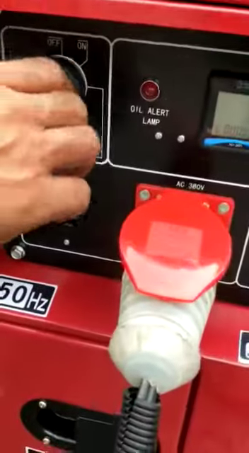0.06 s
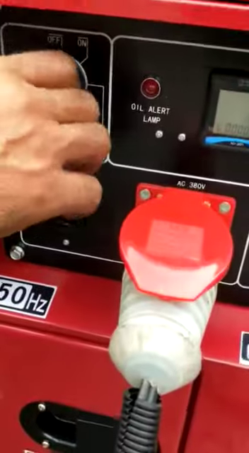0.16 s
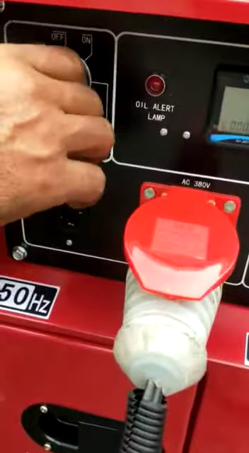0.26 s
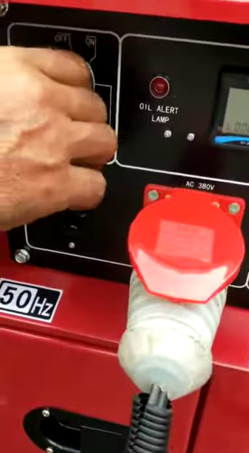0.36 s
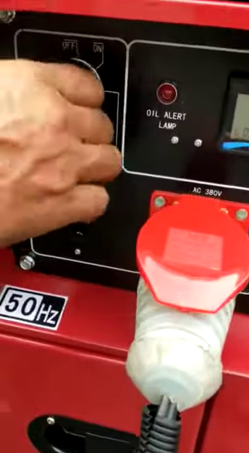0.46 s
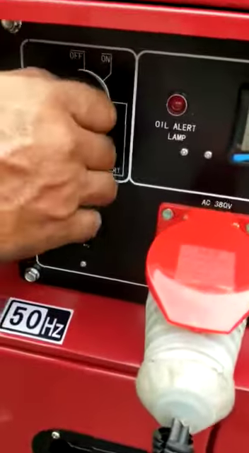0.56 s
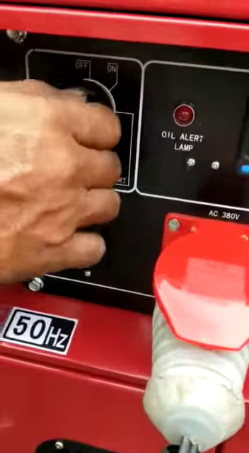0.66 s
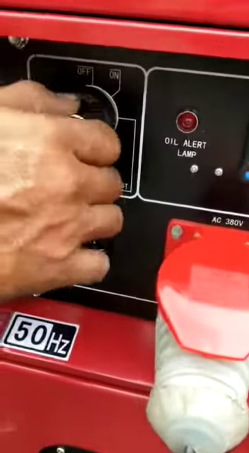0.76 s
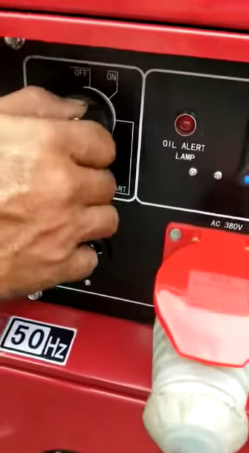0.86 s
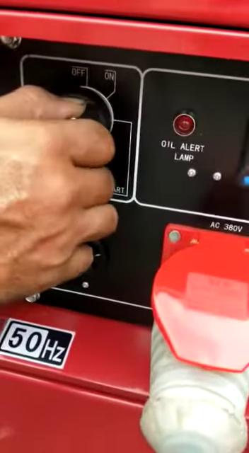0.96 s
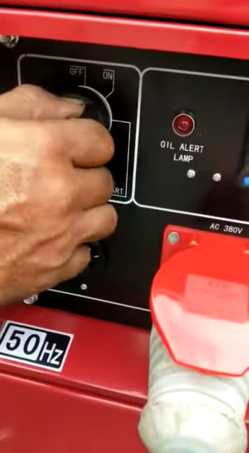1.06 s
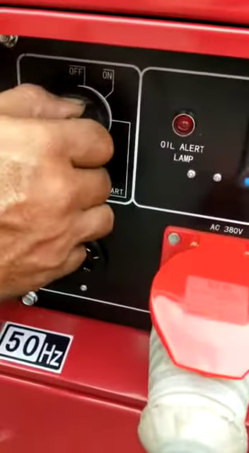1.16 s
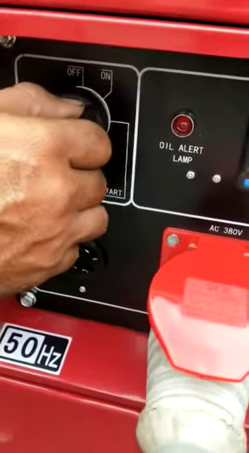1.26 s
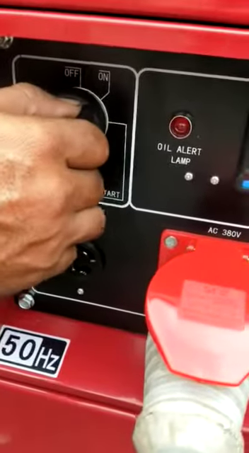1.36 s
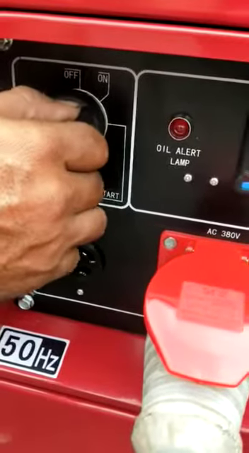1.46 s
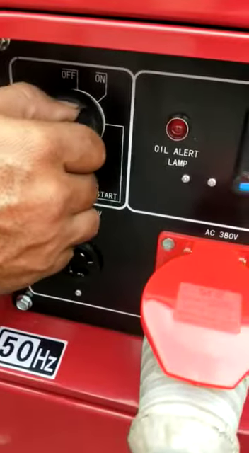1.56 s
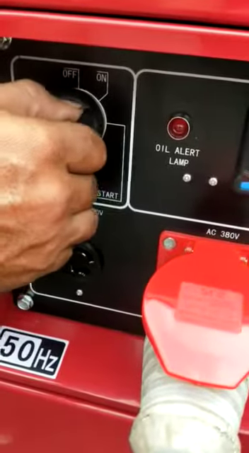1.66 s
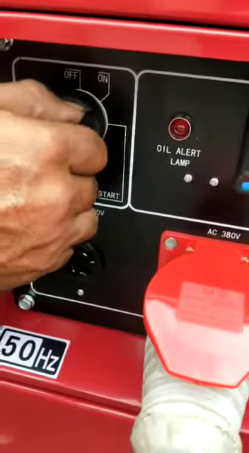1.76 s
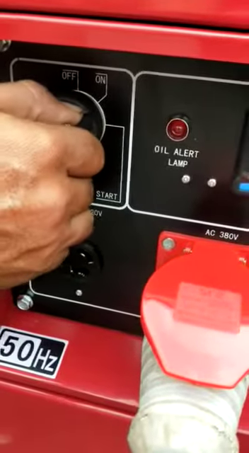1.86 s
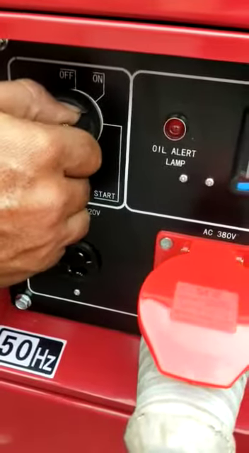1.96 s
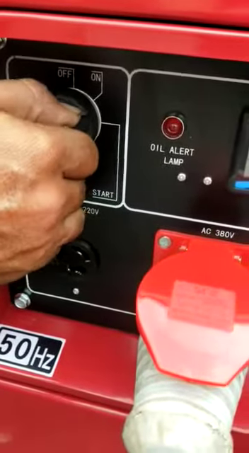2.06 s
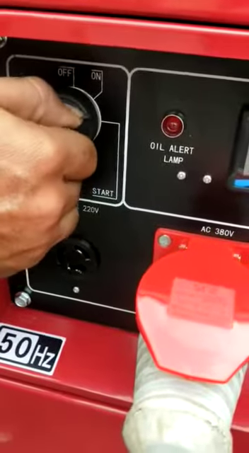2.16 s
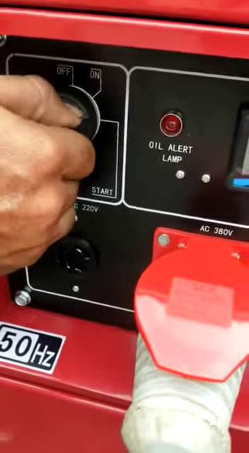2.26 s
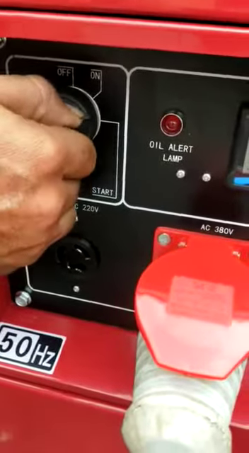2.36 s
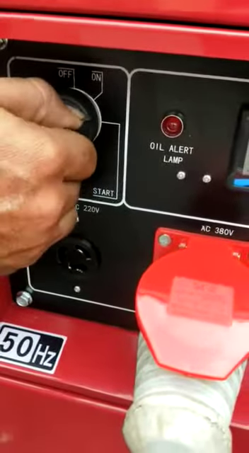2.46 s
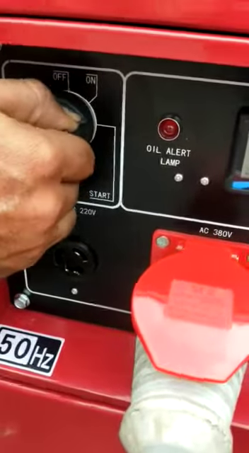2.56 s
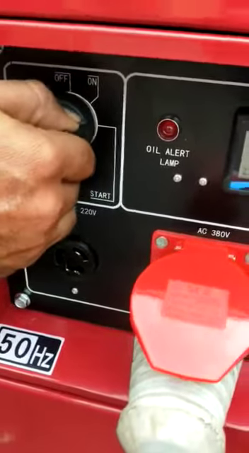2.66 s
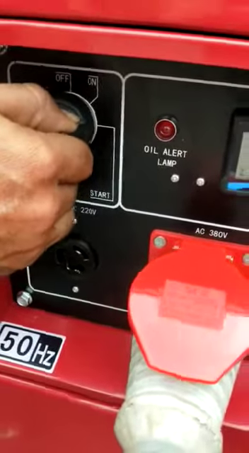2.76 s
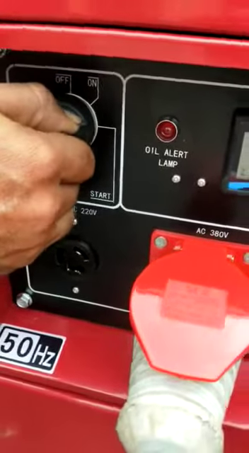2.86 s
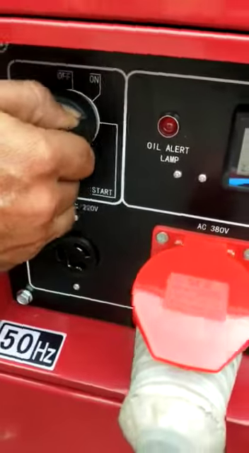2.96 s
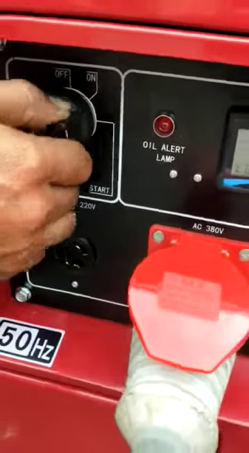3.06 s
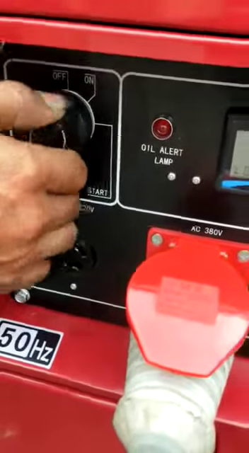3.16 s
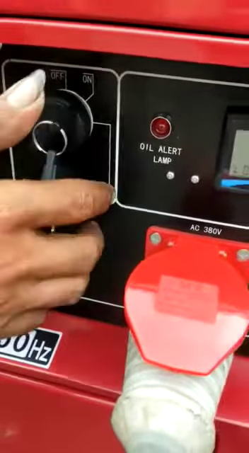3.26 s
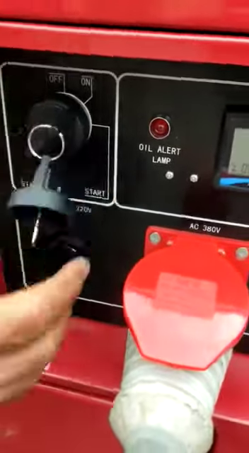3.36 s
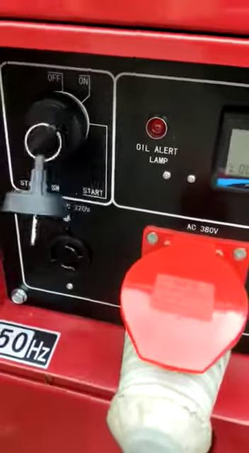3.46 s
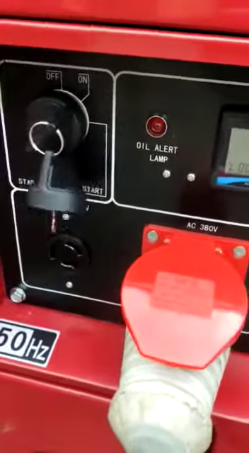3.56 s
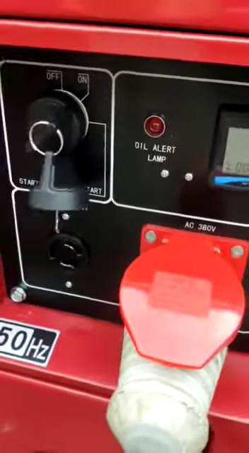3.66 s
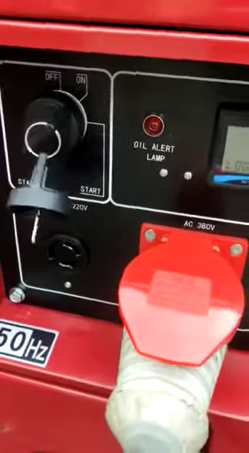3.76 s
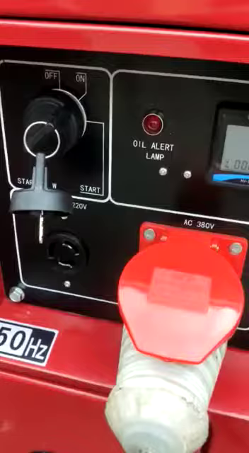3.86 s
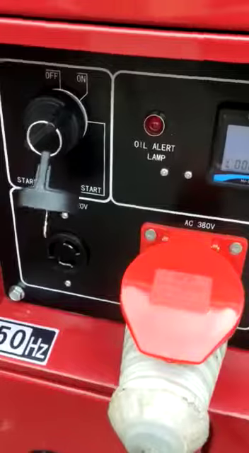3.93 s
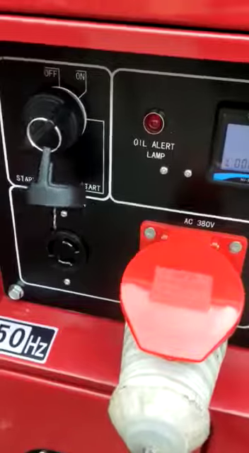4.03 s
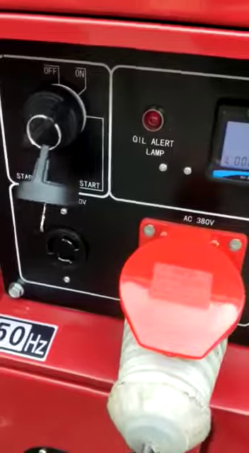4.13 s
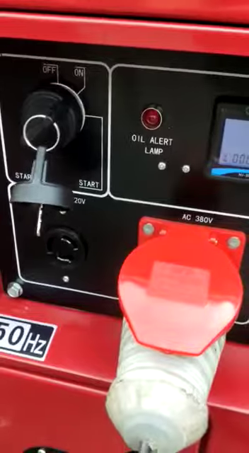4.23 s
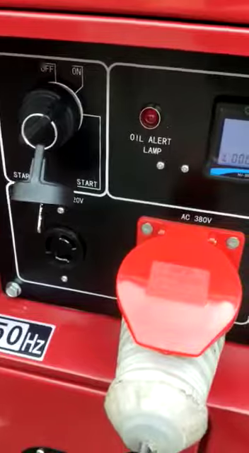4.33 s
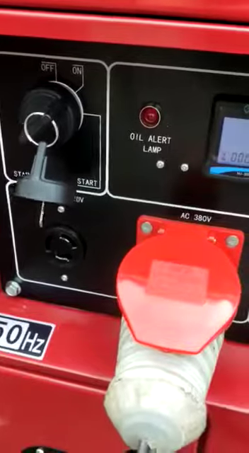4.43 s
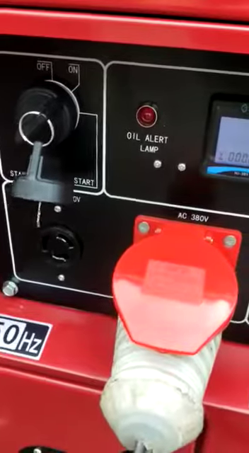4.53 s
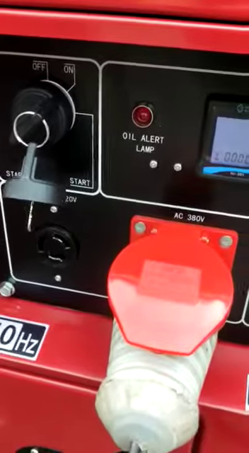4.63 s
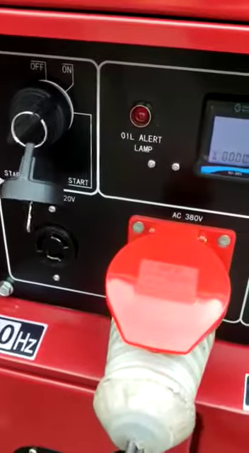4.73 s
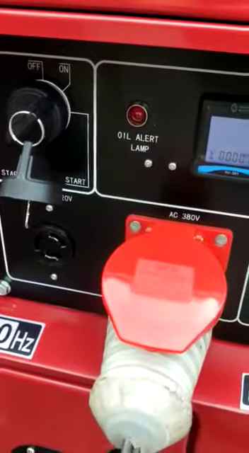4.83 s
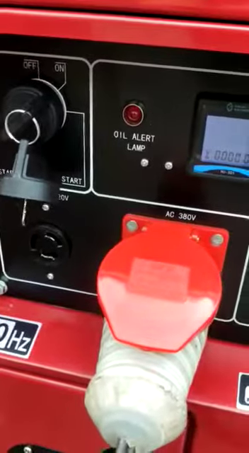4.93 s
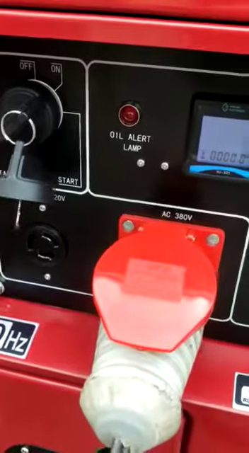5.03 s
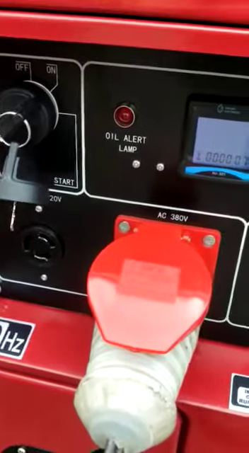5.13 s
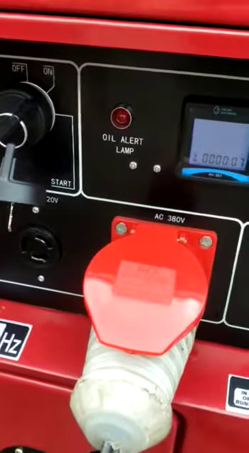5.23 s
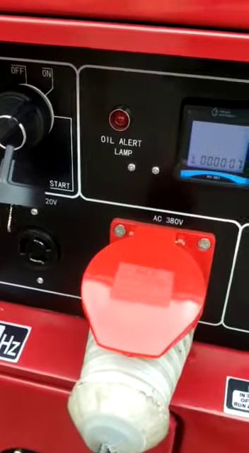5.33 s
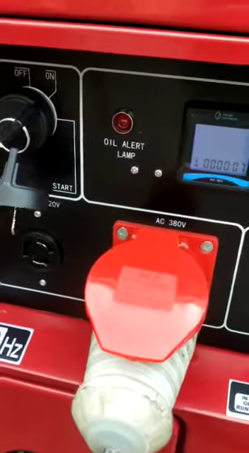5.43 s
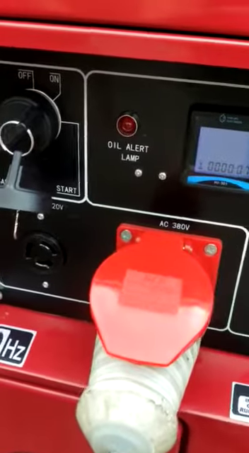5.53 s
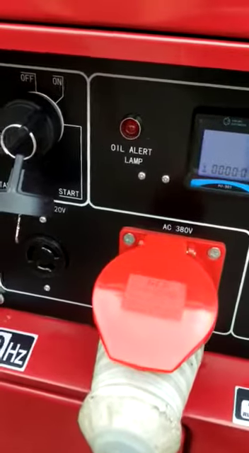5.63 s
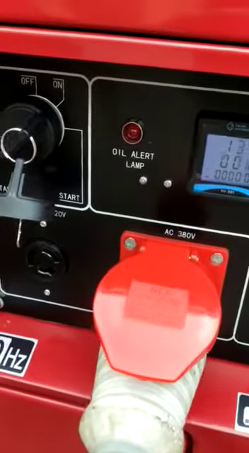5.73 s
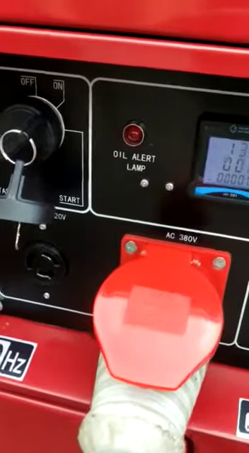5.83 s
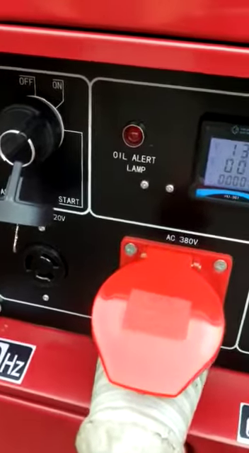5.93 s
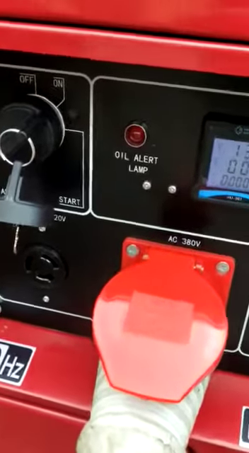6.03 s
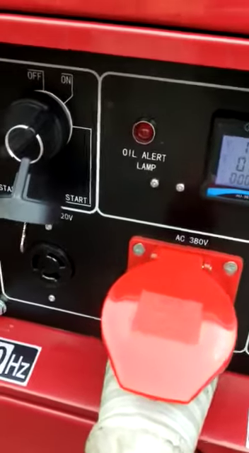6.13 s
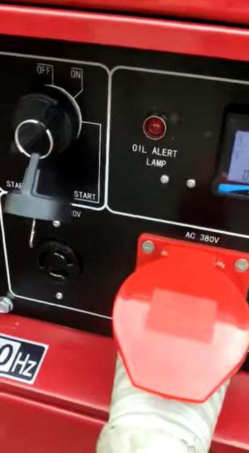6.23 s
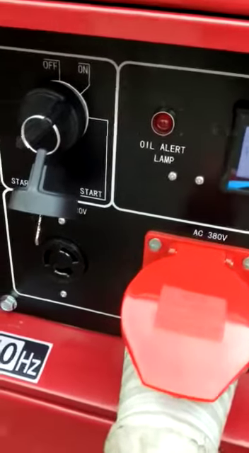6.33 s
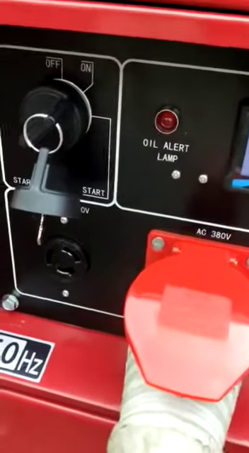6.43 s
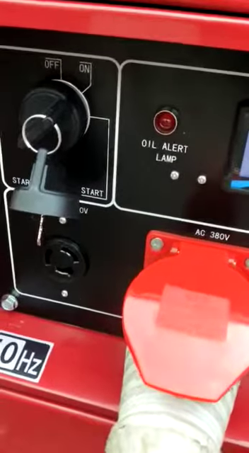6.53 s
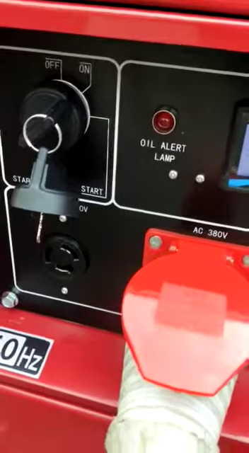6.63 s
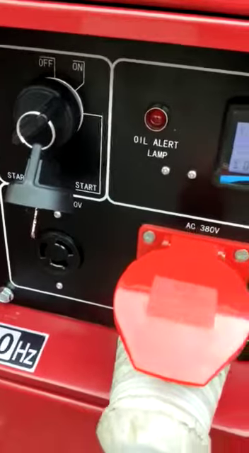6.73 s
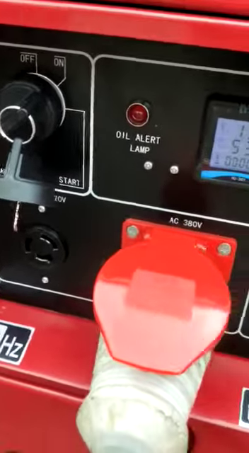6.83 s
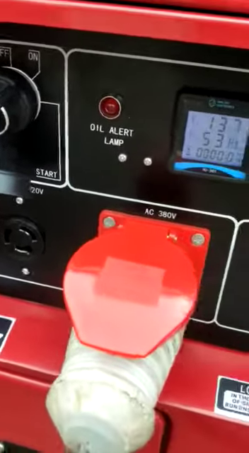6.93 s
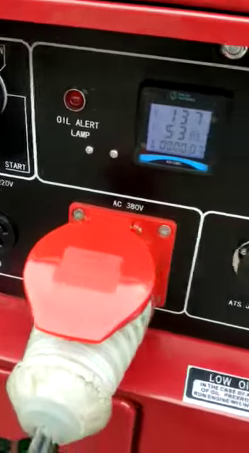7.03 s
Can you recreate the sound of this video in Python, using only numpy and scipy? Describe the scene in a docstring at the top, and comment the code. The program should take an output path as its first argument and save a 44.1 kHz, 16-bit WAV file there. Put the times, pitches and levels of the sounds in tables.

```python
"""Starting a diesel generator in a yard

A key clicks, the solenoid clunks, a starter motor whines up in gear noise and a boxed single-cylinder diesel
knocks faster and faster. The governor cuts the fuel for a moment at overspeed and the engine runs steadily.
Each firing strikes resonances and noise; the exhaust is a stack of tones; boom and clatter are coloured noise.
Clicks and clunks are short rings, sparrows are gliding tones, and far traffic and birds are filtered noise."""
import sys
import numpy as np
from scipy import signal
from scipy.fft import rfft, irfft, next_fast_len
from scipy.io import wavfile
from scipy.ndimage import uniform_filter1d, map_coordinates

SR = 44100
rng = np.random.default_rng(int(sys.argv[2]) if len(sys.argv) > 2 else 0)


def elevation(decibels):
    """Turn decibel levels (scalar or array-like) into linear amplitude ratios."""
    levels = np.asarray(decibels, float)
    return 10 ** (levels / 20)


def unload_wav(signal):
    """Save mono or channel-first audio to the path in sys.argv[1] as 16-bit WAV at rate SR, clipped to [-1, 1]."""
    wavfile.write(
        sys.argv[1],
        SR,
        np.round(np.clip(np.atleast_2d(signal).T, -1, 1) * 32767).astype(np.int16),
    )


N = 312669  # length in samples
GOVERNED_HZ = 26.4  # firings per second that the governor holds
SETTLE_S = 4.36  # the set takes up its steady state


def unit(x):
    """Scale to an rms of 1."""
    return x / np.sqrt(np.mean(x ** 2) + 1e-20)


def along(points, hz):
    """Read a curve of (Hz, value) points on a log frequency axis."""
    f, value = np.transpose(points)
    return np.interp(np.log(hz + 1), np.log(f + 1), value)


def curves(rows):
    """Draw each column against time; the first result marks the time span of the rows."""
    s, *columns = np.transpose(rows)
    t = np.arange(N) / SR
    inside = (t >= s[0]) & (t <= s[-1])
    return [inside] + [np.interp(t, s, column) for column in columns]


def wobble(rate):
    """A smooth random curve with `rate` random points a second."""
    points = rng.standard_normal(int(N * rate / SR) + 4)
    return map_coordinates(points, [np.arange(N) * rate / SR])


def filtered(x, response):
    """Multiply the spectrum of x by a response that depends on frequency."""
    m = 2 * next_fast_len(N // 2 + SR // 4)
    return irfft(rfft(x, m) * response(np.fft.rfftfreq(m, 1 / SR)), m)[..., :N]


def resonances(modes):
    """Response of ringing parts, given as (Hz, width in Hz, dB), with alternating signs."""
    def response(f):
        return sum((-1) ** i * elevation(db) * 1j * f * width / (hz * hz - f * f + 1j * f * width)
                   for i, (hz, width, db) in enumerate(modes))
    return response


def noise(spectrum, alike=1):
    """Coloured noise of rms 1 at two ports; `alike` is the share they have in common."""
    common = alike * rng.standard_normal(N)
    white = common + np.sqrt(abs(1 - alike ** 2)) * rng.standard_normal((2, N))
    return unit(filtered(white, lambda hz: elevation(along(spectrum, hz))))


def train(s, gain):
    """One-sample impulses at the given times."""
    at = np.round(s * SR).astype(int)
    return np.bincount(at[at < N], gain[at < N], N)


def blows(events, modes, crack):
    """Each blow rings the modes at new strengths over a short crack of noise."""
    out, t = np.zeros(N + SR), np.arange(SR // 4) / SR
    for s, db in events:
        ring = sum(elevation(level + rng.normal(0, 3.4) - 60 * t / t60) * np.sin(2 * np.pi * hz * t)
                   for hz, level, t60 in modes)
        ring = ring + crack * elevation(-60 * t / 0.029) * rng.standard_normal(len(t))
        out[round(s * SR):][:len(t)] += elevation(db) * ring
    return out[:N]


def envelope_db(start, rise, hold, fall_db_per_s):
    """Climb 40 dB per rise time up to 0 dB, hold, then fall steadily."""
    t = np.arange(N) / SR - start
    return -40 * np.clip(1 - t / rise, 0, 5) - fall_db_per_s * np.clip(t - rise - hold, 0, None)


def engine():
    """The crank drives every part of the engine: knock, exhaust drone, boom, clatter and standing tones."""
    hz, cycle = crank()
    turning = elevation(envelope_db(start=2.548, rise=0.029, hold=0, fall_db_per_s=0))  # the crank is thrown round
    tones = merging() * elevation(drone_level(hz) + 4 + 0.28 * wobble(9)) * standing(cycle + 0.029)
    return knock(cycle) + turning * (drone(hz, cycle) + boom(hz, cycle) + clatter(hz, cycle)), tones


# Engine speed from the first compression, over the governed rate and back.
# Each row: time in seconds, firings per second.
ENGINE_SPEED = [(2.588, 6.105), (2.75, 5.972), (2.95, 7.948), (3.3, 12.328), (3.8, 19.397), (4.2, 24.631),
                (4.44, 27.425), (4.62, 25.529), (4.74, 26.623), (4.9, 26.425), (6.3, 26.381), (7.1, 26.349)]


def crank():
    """Firing rate, and the cycles turned so far as its running sum."""
    turning, hz = curves(ENGINE_SPEED)
    return hz, np.cumsum(hz * turning) / SR


def slowness(hz):
    """How far the engine is below governed speed: 1 at standstill, 0 at or above it."""
    return np.clip(1 - hz / GOVERNED_HZ, 0, 1)


def steadiness(hz):
    """Near 0 while the set rocks on its mounts, near 1 above a firing rate of 17.2 Hz."""
    return 1 / (1 + (17.2 / hz) ** 12)


def settling():
    """Approach from 0 to 1 as the set takes up its steady state."""
    return 1 - np.exp(-np.clip(np.arange(N) / SR - SETTLE_S, 0, None) / 0.5)


def merging():
    """Share, up to 0.85, in which the rings of successive firings merge into standing tones."""
    return .85 * np.clip((np.arange(N) / SR - 4.66) / .2, 0, 1)


# Fuel burnt in each firing, cut at overspeed, heard as the strength of the knock.
# Each row: time in seconds, relative knock peak in dB.
FUEL_BURNT = [(2.66, -23.5), (2.72, -6.5), (3.1, -8.5), (3.7, -8), (4.37, -11.5), (4.41, -12.5),
              (4.44, -29.5), (4.56, -22), (4.6, -17.5), (4.634, -8), (4.71, -16), (5.2, -15.5),
              (7.09, -8.5)]


def fuel_level(s):
    """Fuel sets how hard a firing knocks, in relative dB."""
    return np.interp(s, *np.transpose(FUEL_BURNT))


# Ringing parts of the engine block. Each row: pitch in Hz, width in Hz, relative level in dB.
BLOCK_RING = [(495, 34, 5), (715, 50, -5), (860, 55, -10), (1000, 60, -5), (1110, 60, -4), (1215, 60, -2),
              (1290, 60, 0), (1365, 65, 1), (1440, 65, -6)]
# Ringing parts of the cylinder head. Each row: pitch in Hz, width in Hz, relative level in dB.
HEAD_RING = [(1740, 90, -15), (1900, 100, -12), (2220, 100, -11), (2490, 100, -15), (2700, 110, -15),
             (2900, 110, -17), (3150, 140, -18), (3340, 140, -13), (3520, 150, -12), (5200, 600, -26)]
# Colour of the noisy part of the knock. Each row: frequency in Hz, relative level in dB per Hz.
KNOCK_COLOUR = [(700, -14), (1300, 5), (2000, -15), (2900, -13.5), (3450, -12), (3900, -24.5),
                (5300, -15.5), (6500, -29), (8000, -36.5), (12800, -36), (16200, -29.5)]


def knock(cycle):
    """Combustion pressure strikes the block and head once a cycle and crackles as it burns."""
    firing = np.arange(int(cycle[-1]) + 1) + 1e-3
    s = np.interp(firing, cycle, np.arange(N) / SR)
    chance = rng.standard_normal((len(s), 2))
    scatter_db = 0.17 + 1.6 * (s < SETTLE_S)  # burning is uneven below the governed rate
    knock_db = fuel_level(s) + scatter_db * chance[:, 0]
    ignition_s = s - 0.00121 + .00003 * chance[:, 1]  # just before top dead centre
    hits = train(ignition_s, elevation(knock_db))

    t = np.arange(4000) / SR
    pressure = (1 - np.exp(-t / .0006)) * np.exp(-t / .009)
    burning = signal.fftconvolve(hits, pressure)[:N]
    fresh = burning * rng.standard_normal(N)  # new in each cycle
    # The sharp pressure step and the piston slap after it repeat from cycle to cycle.
    step = 7.5 * hits + 3.5 * np.roll(hits, 113) + 4 * np.roll(hits, 250)

    merged = merging()
    to_block = (1 - merged) * step + .3 * (1 - .85 * merged) * fresh
    to_head = (.8 + .4 * merged) * step + .4 * (1 - .5 * merged) * fresh
    ring = filtered(to_block, resonances(BLOCK_RING)) + filtered(to_head, resonances(HEAD_RING))
    crack = burning * noise(KNOCK_COLOUR, alike=0.14)
    return elevation(19.5) * ring + elevation(-1.0 - 7.8 * merged) * crack


def drone_level(hz):
    """Exhaust level in dB: weaker while rocking, growing with speed, swelling as the set settles."""
    octaves = np.log2(hz / GOVERNED_HZ)
    return -15.5 - 12 * (1 - steadiness(hz)) + 1.5 * octaves + 5.5 * settling()


# Exhaust tones. Each row: multiple of the firing rate, relative level in dB.
EXHAUST_TONES = [(1, -28), (2, -22), (3, -5), (4, 0), (5, -6), (6, -8), (7, -7), (8, -15), (9, -9),
                 (10, -18), (11, -10), (12, -26), (13, -23), (14, -17), (15, -27), (16, -12), (17, -14),
                 (18, -25), (19, -19)]
# Each exhaust pulse leaves the silencer chambers three times, which sets the phases of the lower tones.
# Each row: delay in cycles, signed strength.
CHAMBER_EXITS = [(.416, -.48), (.653, -.71), (.872, 1)]


def drone(hz, cycle):
    """Exhaust pulses repeat once a cycle, so they sound as tones on multiples of the firing rate."""
    delay, strength = np.transpose(CHAMBER_EXITS)

    def outlet(f):
        return 1 / (1 + (123 / f) ** 3.1)  # the outlet radiates weakly below 123 Hz

    out = np.zeros(N)
    for k, db in EXHAUST_TONES:
        if k < 13:
            lag = np.angle(np.sum(strength * np.exp(-2j * np.pi * k * delay))) - 2.13
        else:
            lag = struck_after(k)
        # While the engine labours the lower tones tilt brighter: dB per octave at standstill.
        labour_db = 16.5 * slowness(hz) * np.log2(k / 4) * (k < 12)
        level = elevation(db + labour_db + .8 * wobble(7)) * outlet(k * hz) / outlet(k * GOVERNED_HZ)
        out += level * np.cos(2 * np.pi * k * cycle + lag + .12 * wobble(7))
    return elevation(drone_level(hz)) * out


# Colour of the canopy boom. Each row: frequency in Hz, relative level in dB per Hz.
BOOM_COLOUR = [(18, -50), (40, -3), (62, -6), (85, -2.5), (115, 1.5), (200, -3), (300, -9.5), (480, -5.5),
               (700, -13.5), (1100, -20), (2000, -100)]


def boom(hz, cycle):
    """The canopy booms after each firing: deep noise that swells once a cycle."""
    puff = 1 + (0.34 + 0.17 * slowness(hz)) * np.cos(2 * np.pi * (cycle - .25))
    boom_db = -18 - 1.5 * steadiness(hz) - 8 * settling()  # weaker once steady and settled
    return elevation(boom_db + 1.5 * wobble(14)) * puff * noise(BOOM_COLOUR, alike=.98)


# Colour of the valve-gear clatter. Each row: frequency in Hz, relative level in dB per Hz.
CLATTER_COLOUR = [(180, -34), (300, -12), (433, -9), (657, -16), (727, -15), (850, -21), (1300, -22),
                  (2000, -22), (3400, -27), (4120, -33), (5300, -28), (6500, -38), (8450, -53),
                  (16200, -47)]
# Colour of the clatter that repeats. Each row: frequency in Hz, relative level in dB per Hz.
REPEATING_COLOUR = [(1350, -60), (1600, -2.5), (2500, -10), (3300, -8), (4000, -29), (5300, -34),
                    (6500, -48.5)]


def clatter(hz, cycle):
    """Valve gear rattles as noise, part of it the same in every cycle, with a pulse as valves seat."""
    slow, repeats = slowness(hz), 0.51  # sets how much of the clatter repeats
    one_cycle = irfft(np.exp(2j * np.pi * rng.random(round(SR / GOVERNED_HZ / 2))))
    same = one_cycle[(cycle % 1 * len(one_cycle)).astype(int)] * (1 - slow) ** 2
    same = unit(filtered(same, lambda f: elevation(along(REPEATING_COLOUR, f))))
    pulse = 0.46 + 1.02 * np.exp(-4 * (cycle % 1)) + 0.42 * np.exp(-9 * ((cycle - .62) % 1))
    changing = noise(CLATTER_COLOUR, alike=0.44) * np.sqrt(1 - repeats ** 2 * (1 - slow) ** 4)
    rattle = changing + 0.63 * repeats * same * pulse
    seats = 1 + 0.053 * np.exp(-9 * ((2 * cycle + 0.32) % 1))  # valves seat once a turn

    t = np.arange(N) / SR
    fuel_db = uniform_filter1d(fuel_level(t), size=2001) + 10
    jolt_db = 27 * np.exp(-abs(t - 2.585) / 0.018)  # extra clatter at the first compression
    level_db = -23 + 5.5 * np.log2(hz / GOVERNED_HZ) + 0.36 * fuel_db + 3.5 * settling() + jolt_db
    return elevation(level_db + 1.3 * wobble(20)) * seats * rattle


# Each group of tones is struck at its own moment of the cycle.
# Each row: highest multiple of the firing rate in the group, delay in cycles.
STRIKE_MOMENTS = [(21, .55), (28, .2), (33, .4), (41, .63), (47, .06), (53, .2), (60, .66)]


def struck_after(k):
    """A tone struck later in the cycle lags in phase, in radians."""
    top, delay = np.transpose(STRIKE_MOMENTS)
    return -2 * np.pi * k * delay[np.searchsorted(top, k)]


# Tones of canopy and block when the rings of successive firings overlap at governed speed.
# Each row: multiple of the firing rate, relative level in dB before the upper tones are raised.
STANDING_TONES = [(20, -20), (21, -23), (22, -28), (23, -27), (24, -28), (25, -25), (26, -19), (27, -18),
                  (28, -27), (29, -28), (30, -25), (31, -29), (32, -27), (33, -24), (34, -32), (35, -28),
                  (36, -24), (37, -30), (38, -24), (39, -29), (40, -32), (41, -27), (42, -26), (43, -33),
                  (44, -26), (45, -25), (46, -24), (47, -29), (48, -28), (49, -29), (50, -33), (51, -24),
                  (52, -25), (53, -35), (54, -31), (55, -36), (56, -29), (57, -33), (58, -38), (59, -34),
                  (60, -36)]


def standing(cycle):
    """One cycle of tones that start sharply and ring out, read at the crank angle."""
    k, db = np.transpose(STANDING_TONES)
    db = db + .22 * np.clip(k - 30, 0, 22)  # tones above the 30th are raised, more and more up to the 52nd
    # Folding the cepstrum gives minimum phase: the energy comes as early as possible.
    cepstrum = irfft(np.log(elevation(np.interp(np.arange(129), k, db, -30, -40))))
    cepstrum[1:128] *= 2
    cepstrum[129:] = 0
    tones = np.zeros(1025, complex)
    at = k.astype(int)
    tones[at] = np.exp(rfft(cepstrum)[at] + 1j * struck_after(k)) * 1024
    return np.interp(cycle % 1, np.arange(2048) / 2048, irfft(tones), period=1)


# Overtones of the motor's commutator. Each row: multiple of its pitch, relative level in dB.
WHINE_TONES = [(1, -4), (2, -16), (3, -11), (4, -5.5), (5, -9)]
# Colour of the starter gear noise. Each row: frequency in Hz, relative level in dB per Hz.
GEAR_COLOUR = [(80, -12), (200, -7), (676, -8), (990, -17), (1200, -10.5), (2420, -13.5), (3400, -12),
               (3750, -20), (4050, -28), (4470, -15), (5300, -12.5), (7450, -34), (13800, -41),
               (16000, -69)]
# Ring of the starter gears. Each row: pitch in Hz, width in Hz, relative level in dB.
GEAR_MODES = [(1130, 50, -5), (1800, 60, -7), (2230, 50, -4), (3500, 70, 0)]
# The casing thuds as the pinion meshes. Each row: frequency in Hz, relative level in dB per Hz.
THUD_COLOUR = [(100, -11), (250, 4.5), (450, 4), (900, -4), (1300, -15), (2200, -30), (5000, -45),
               (16000, -62)]
# Blows of solenoid and pinion. Each row: time in seconds, relative level in dB.
CLUNK_TIMES = [(2.218, -48), (2.226, -29), (2.233, -35), (2.239, -18), (2.256, -28), (2.272, -30.5),
               (2.292, -32), (2.558, -30)]
# Ringing of those blows. Each row: pitch in Hz, relative level in dB, seconds to fall 60 dB.
SOLENOID_MODES = [(446, 7.5, 0.1), (487, 8, 0.037), (670, -10, .05), (836, 13, 0.028), (890, -7, 0.056),
                  (1830, 2.5, 0.032), (2180, -18, 0.027)]


def starter():
    """The solenoid clunks, then the motor whines up to its free speed in gear noise."""
    t, start = np.arange(N) / SR, 2.22
    stall_hz, free_hz, spin_up_s = 296.4, 789, .39
    to_go = np.clip(1 - (t - start) / spin_up_s, 0, 1)
    hz = free_hz - (free_hz - stall_hz) * to_go ** 1.6
    phase = 2 * np.pi * np.cumsum(hz * (1 + 0.01 * wobble(70))) / SR
    whine = sum(elevation(db + 1.4 * wobble(24.4)) * np.sin(k * phase) for k, db in WHINE_TONES)
    whine_db = -30.5 + envelope_db(start, rise=.1, hold=.22, fall_db_per_s=140)

    ring = unit(filtered(rng.standard_normal(N), resonances(GEAR_MODES)))
    ring_db = 1.8 * wobble(29.95) + envelope_db(start, rise=0.087, hold=0.27, fall_db_per_s=100)
    gear = noise(GEAR_COLOUR, alike=0.59) + 0.66 * ring * elevation(ring_db)
    gear_db = -29.5 + envelope_db(start - .008, rise=0.014, hold=0.64, fall_db_per_s=26)
    engaged = t < 3.0  # the gear noise stops at the release

    thud_db = -18.0 + envelope_db(start, rise=0.014, hold=0.0095, fall_db_per_s=234)
    thud = elevation(thud_db) * noise(THUD_COLOUR, alike=0.91)
    clunks = elevation(-3.0) * blows(CLUNK_TIMES, SOLENOID_MODES, crack=0.11)
    return elevation(whine_db) * whine + engaged * elevation(gear_db) * gear + thud + clunks


# Clicks of the key detent. Each row: time in seconds, relative level in dB.
CLICK_TIMES = [(.495, -60), (.5145, -23.5), (.5205, -45), (.53, -38.5)]
# Ringing of the switch. Each row: pitch in Hz, relative level in dB, seconds to fall 60 dB.
SWITCH_MODES = [(183, -25, 0.035), (382, -15, 0.057), (980, 2, 0.017), (2180, -6, 0.023), (3140, -2, 0.013),
                (5150, 0.5, .012), (6220, -16, 0.0094)]
# Colour of the clicks. Each row: frequency in Hz, gain in dB.
SNAP_COLOUR = [(60, -9), (250, -5.5), (700, -6), (1500, -0.5), (6000, 6), (8000, -8), (16000, -10)]
# One tap on the panel: time in seconds, level in dB before the panel's filter.
PANEL_TAP = (1.2705, -8)


def key():
    """The detent snaps over as short rings; later something taps the panel, a dull broad resonance."""
    panel = resonances([(300, 500, 0)])
    impulse = train(np.array(PANEL_TAP[:1]), elevation(PANEL_TAP[1:]))
    tap = filtered(impulse, lambda hz: panel(hz) * np.exp(-(hz / 1800) ** 2))
    clicks = blows(CLICK_TIMES, SWITCH_MODES, crack=1.64)
    return filtered(clicks, lambda hz: elevation(along(SNAP_COLOUR, hz))) + tap


# Shape of one sparrow chirp.
# Each row: seconds from its start, pitch in Hz before each chirp's own scaling, relative level in dB.
CHIRP_SHAPE = [(0, 5970, -20), (.008, 5650, -7), (.018, 5350, 5), (.022, 3600, -15), (.028, 3750, 0),
               (.036, 4270, -7), (.04, 4700, -16), (.046, 4720, 11), (.051, 3950, -26), (.058, 3850, -1),
               (.064, 3340, -10), (.072, 3050, -5), (.088, 2700, -15)]
# The chirps. Each row: start in seconds, relative level in dB, pitch as a multiple of the shape's.
CHIRP_CALLS = [(0.019, -62, 1.03), (0.147, -53, 1.04), (0.164, -59.5, 1.02), (.185, -62, 0.89),
               (0.204, -61, 1.2), (.98, -46.5, 0.94), (1.053, -41.5, 0.99), (1.942, -45.5, 0.97),
               (2.02, -42.5, 0.98)]


def sparrows():
    """One hoarse chirp shape, a gliding tone with a shaky pitch, varied from call to call."""
    out, (s, hz, db) = np.zeros(N), np.transpose(CHIRP_SHAPE)
    t = np.arange(round(s[-1] * SR)) / SR
    for start, level, higher in CHIRP_CALLS:
        shake = 0.015 * rng.standard_normal() + 0.032 * wobble(498)[:len(t)]
        pitch = uniform_filter1d(np.interp(t, s, hz), size=90) * (higher + shake)
        swell = elevation(level + np.interp(t, s, db) + 2 * wobble(273)[:len(t)])
        swell = swell * np.sin(np.pi * t / s[-1]) ** 0.42
        out[round(start * SR):][:len(t)] += swell * np.sin(2 * np.pi * np.cumsum(pitch) / SR)
    return out


# Level of the yard's background over time. Each row: time in seconds, relative level in dB.
BACKGROUND_LEVEL = [(0, -54), (.3, -56.5), (.71, -53.5), (1.04, -60), (1.3, -50.5), (1.87, -55), (2.2, -51)]
# Colour of the far traffic. Each row: frequency in Hz, relative level in dB per Hz.
TRAFFIC_COLOUR = [(15, -44), (30, -2), (129, 1.5), (193, 0.5), (260, -7), (410, -14), (800, -16),
                  (1100, -24), (2500, -42), (3250, -67), (5500, -120)]
# Colour of the far birds. Each row: frequency in Hz, relative level in dB per Hz.
TWITTER_COLOUR = [(1000, -45), (1600, 1.5), (2800, 0.5), (3600, -6), (5300, 6.5), (5900, -12), (6500, -50),
                  (9000, -120)]


def air():
    """Far traffic is deep noise, much alike at both ports; far birds are a haze of higher noise."""
    _, background_db = curves(BACKGROUND_LEVEL)
    traffic = elevation(background_db + 0.5 * wobble(4.8)) * noise(TRAFFIC_COLOUR, alike=0.93)
    twitter_db = -75 + 2 * (background_db + 57.5)  # the haze follows the background level, twice as far in dB
    haze = noise(TWITTER_COLOUR, alike=0.28)
    bands = np.zeros((2, N))
    for hz in range(1300, 6500, 800):  # each band comes and goes
        bands += elevation(3.5 * wobble(8)) * filtered(haze, lambda f: np.exp(-((f - hz) / 450) ** 2))
    return traffic + elevation(twitter_db) * unit(bands)


# How long the yard rings. Each row: frequency in Hz, seconds to fall 60 dB at a length share of 1.
YARD_DECAY = [(200, 0.25), (1500, 0.89), (5000, 0.3), (12000, 0.72)]


def yard(x, length_share):
    """Walls answer differently at each port, and each frequency dies away at its own speed."""
    hz, t, z = signal.stft(rng.standard_normal((2, SR // 2)), SR, nperseg=256)
    fading = elevation(-60 * t / (length_share * along(YARD_DECAY, hz)[:, None]))
    tail = signal.istft(z * fading, SR, nperseg=256)[1]
    late = np.pad(x, (90, 0))[None]  # the answer comes 90 samples later
    return signal.fftconvolve(late, tail / np.linalg.norm(tail[0]), axes=1)[:, :N]


# Colour difference of the two ports. Each row: frequency in Hz, left minus right in dB.
PORT_COLOUR = [(60, 2), (150, -0.5), (380, -1), (950, 1), (2380, 6), (5980, -5), (15000, 2.5)]


def ports(x):
    """The left port is nearer, so it hears 0.22 ms earlier and in another colour."""
    side, lead_s = np.array([[1], [-1]]), 0.00022
    return filtered(x, lambda hz: elevation(side * along(PORT_COLOUR, hz) / 2)
                    * np.exp(1j * np.pi * side * hz * lead_s))


# The walls' answer to the machine. Each row: frequency in Hz, gain in dB.
MACHINE_ECHO = [(60, -37), (250, -87), (700, 1), (1500, -0.5), (3000, -7), (12000, 1.5)]
# The microphone swings past the set. Each row: time in seconds, left minus right in dB.
MICROPHONE_SWING = [(2.2, 0), (2.7, -1.8), (3.8, -1.5), (4.3, -3), (4.8, -2.4), (5.8, -0.5), (7.09, 0.1)]


def scene():
    """Machine, key, birds and air meet at the two ports, with the yard's answers."""
    motor, tones = engine()
    machine = motor + starter()
    echo = yard(machine.mean(0), length_share=0.12)
    echo = filtered(echo, lambda hz: elevation(along(MACHINE_ECHO, hz)))
    swing = elevation(np.array([[.5], [-.5]]) * curves(MICROPHONE_SWING)[1])
    switch, birds = key(), sparrows()
    near = switch + elevation(-12.0) * yard(switch, length_share=0.57)
    far = 0.84 * birds + elevation(5.0) * yard(birds, length_share=0.79)
    balance = elevation([[-1], [1.1]])  # left and right level of everything but the machine
    return ports(machine + echo + tones) * swing + (near + far + air()) * balance


def roll_off(x):
    """The treble ends steeply here."""
    return signal.sosfilt(signal.butter(12, 16740, fs=SR, output="sos"), x)


def record(dry):
    """The microphone loses the deepest bass and the top, and loud peaks are gently rounded."""
    heard = filtered(dry, lambda hz: (hz < 16200) * (1j * hz / (1j * hz + 30)) ** 2)
    soft = np.tanh(heard / 1.503) * 1.116
    return roll_off(soft)


dry = scene()
out = record(dry)
unload_wav(out)
```